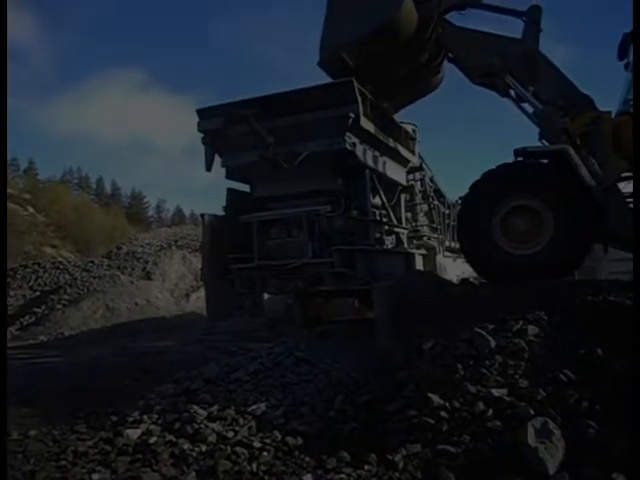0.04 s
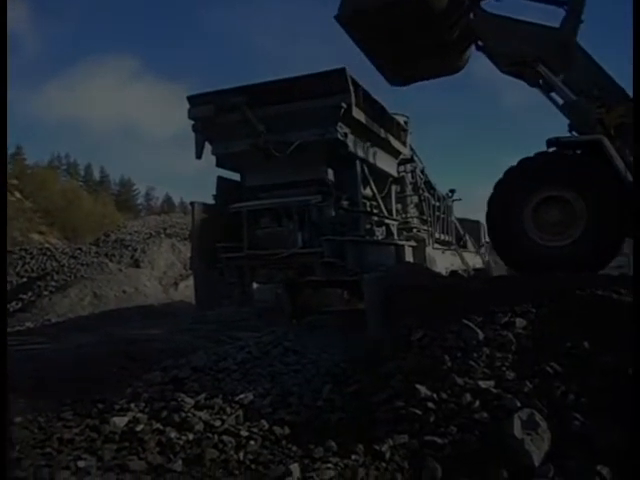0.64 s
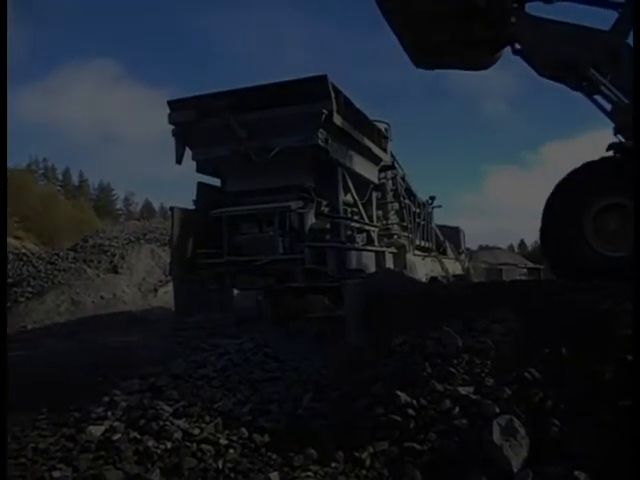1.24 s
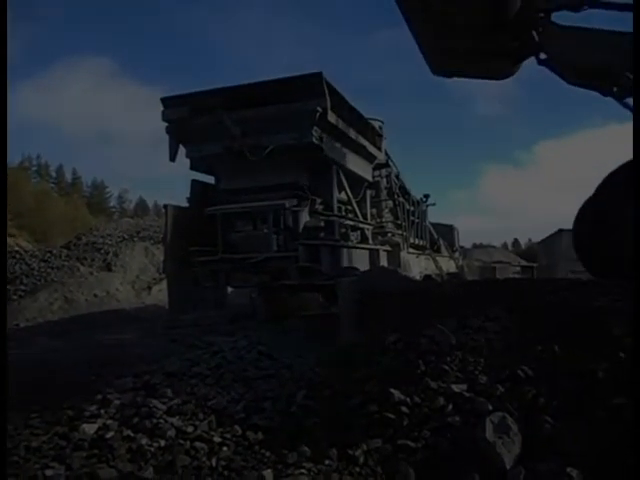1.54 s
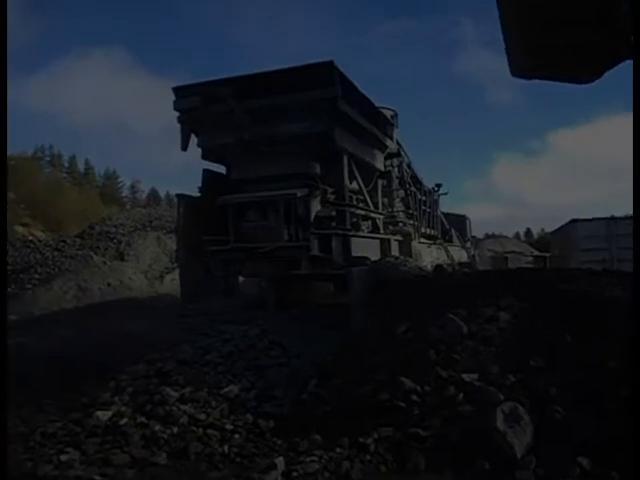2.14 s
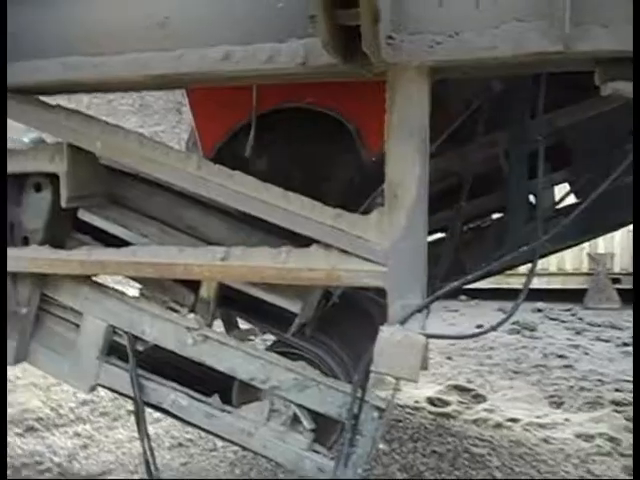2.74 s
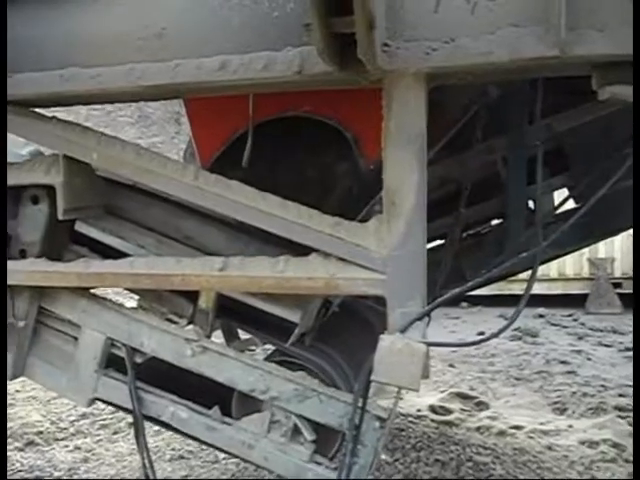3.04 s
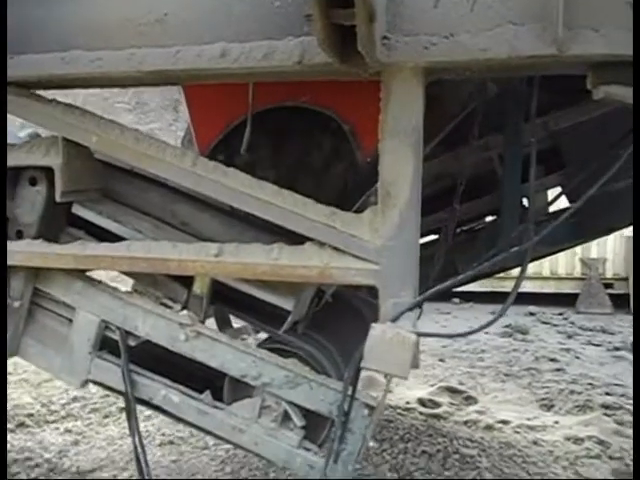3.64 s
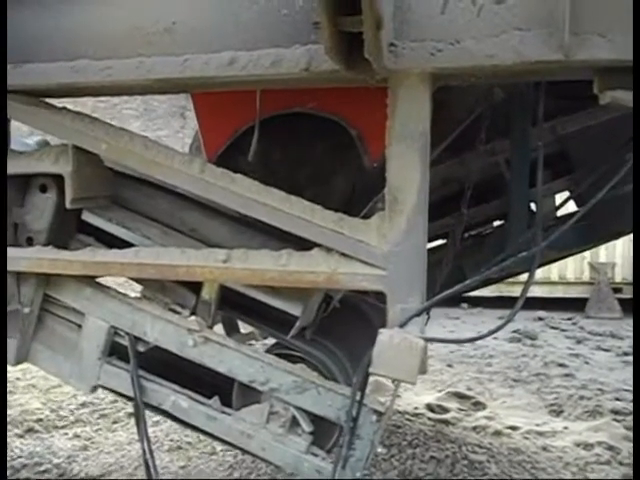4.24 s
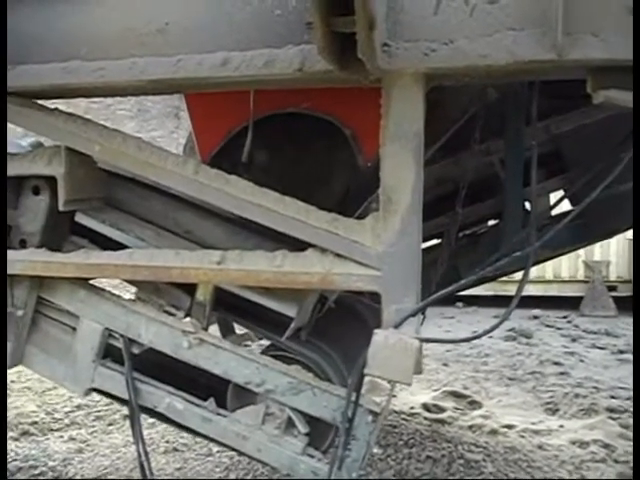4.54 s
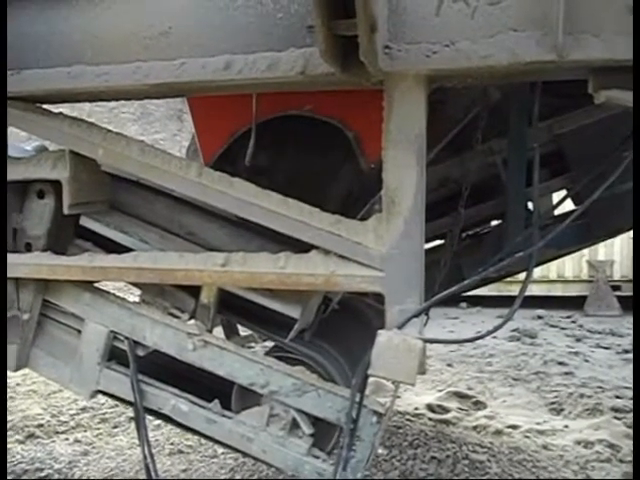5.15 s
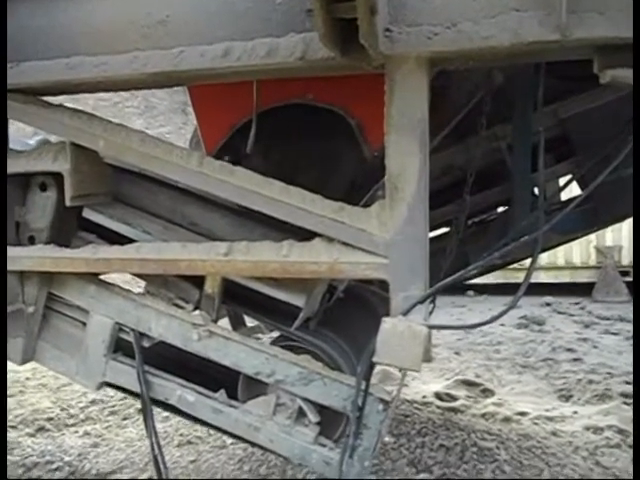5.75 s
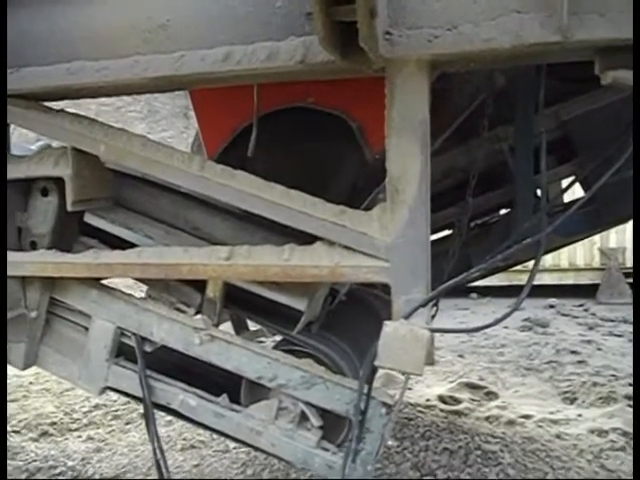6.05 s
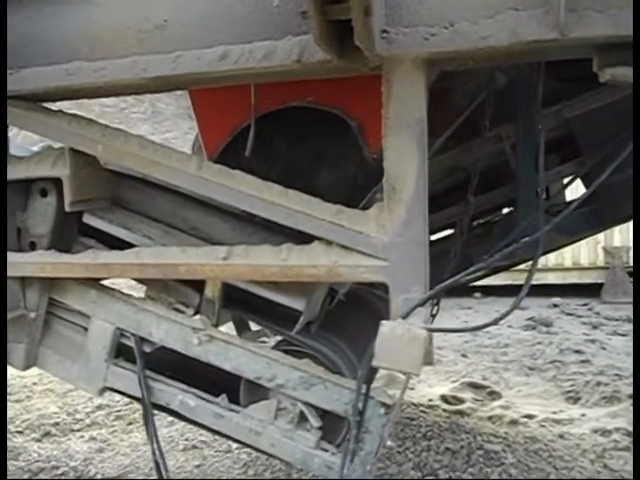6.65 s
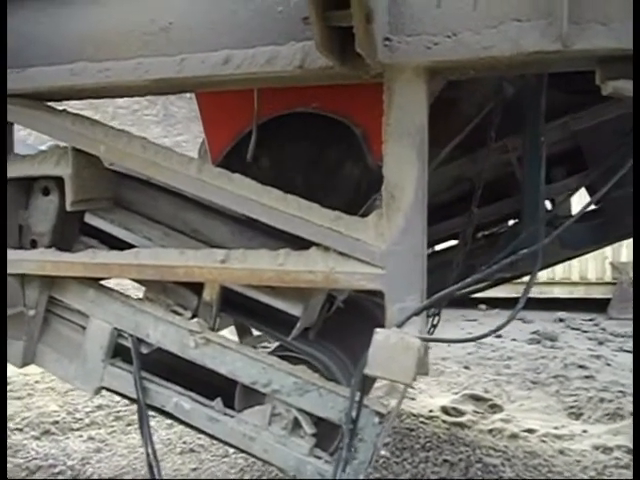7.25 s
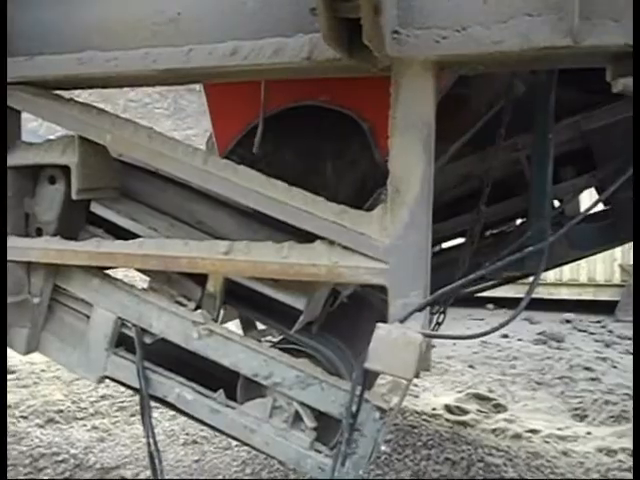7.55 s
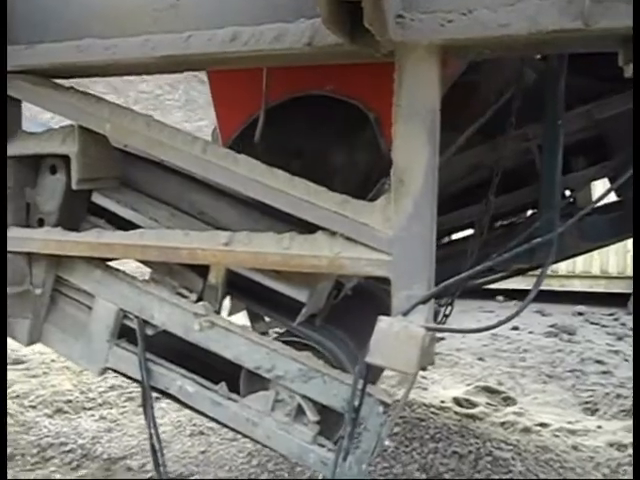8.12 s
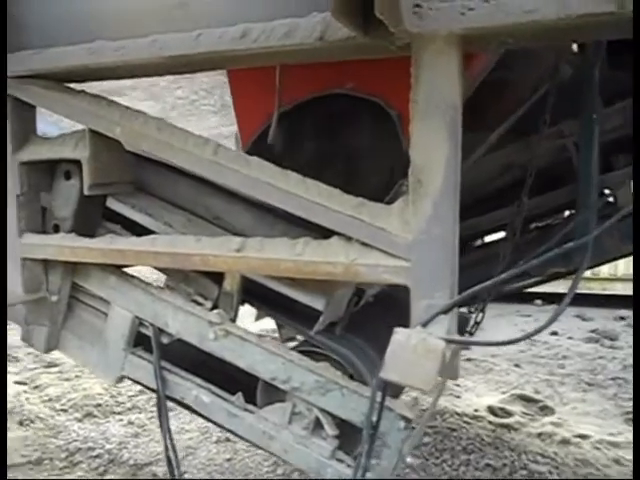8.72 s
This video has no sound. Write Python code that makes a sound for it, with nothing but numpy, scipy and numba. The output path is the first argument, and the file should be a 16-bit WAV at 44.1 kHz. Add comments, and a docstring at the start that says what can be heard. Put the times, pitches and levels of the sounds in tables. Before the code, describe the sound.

Rocks crunch and clatter against steel in a throbbing crusher; after a short silent gap, gravel rattles on with clinks and clanks.

```python
"""Rocks tumble against steel in a mobile rock crusher at work in a gravel pit, and crushed stone rattles.
Both surge as heaps slide and, in front, with each bite of the jaw. Rocks burst, single stones clack,
chips clink and big rocks make steel plates ring. Behind them drone a diesel engine and the screen,
a shaking sieve. We listen in front of the hopper (the feed bin), then, after a silent gap, beside
the conveyor."""
import sys
import numpy as np
from scipy import signal
from scipy.fft import rfft, irfft, next_fast_len
from scipy.io import wavfile
from scipy.ndimage import uniform_filter1d
from numba import njit

SR = 44100
rng = np.random.default_rng(int(sys.argv[2]) if len(sys.argv) > 2 else 0)


def unload_audio(sound):
    """Save the sound as a 16-bit wav file, at the path given as the first command line argument."""
    columns = np.transpose(np.atleast_2d(sound))
    # keep every value between -1 and 1, then stretch to whole-number steps
    steps = np.round(np.clip(columns, -1, 1) * 32767)
    wavfile.write(sys.argv[1], SR, steps.astype(np.int16))


N = 391608
FRONT, SIDE = 1, 2  # the two places we listen from
FRONT_END_S, SIDE_START_S = 2.692, 3.267
SCREEN_HZ, ENGINE_HZ = 16.87, 25.7  # turns per second


def undb(db):
    """Turn decibels into a number to multiply by."""
    return 10 ** (np.asarray(db) / 20)


def unit(x):
    """Scale a signal to an average strength (rms) of one."""
    return x / np.sqrt(np.mean(x ** 2) + 1e-20)


def curve(table, t, column=1):
    """Join the points of a timed table with straight lines."""
    rows = np.array(table)
    return np.interp(t, rows[:, 0], rows[:, column])


def colour(x, points):
    """Shape the tone with (f/Hz, level/dB) points, then scale to strength one."""
    hz, db = np.transpose(points)
    size = next_fast_len(len(x))
    f = np.maximum(np.fft.rfftfreq(size, 1 / SR), 1)
    gain = undb(np.interp(np.log(f), np.log(hz), db))
    return unit(irfft(rfft(x, size) * gain, size)[:len(x)])


def walk(t, rate):
    """A random wobble that takes a new course rate times a second."""
    steps = rng.standard_normal(4096)
    return unit(np.interp((t - t[0]) * rate, np.arange(len(steps)), steps))


def swell(t, s, length):
    """A smooth bump at time s, length seconds wide (0.02 at least) at half height."""
    return .5 ** ((2 * (t - s) / max(length, .02)) ** 2)


def fade(t, t60):
    """Die away by 60 dB every t60 seconds."""
    return np.exp(-np.log(1000) * t / t60)


def add(out, s, x):
    """Mix x into out at time s."""
    i = max(int(s * SR), 0)
    out[i:i + len(x)] += x[:len(out) - i]


def peak_at(db, x):
    """Scale x so that its peak is at db."""
    return undb(db) * x / np.abs(x).max()


@njit
def ring(n, start, size, hz, t60):
    """Every knock starts a pure tone that dies away."""
    out = np.zeros(n)
    for k in range(len(start)):
        z = size[k] + 0j
        pole = np.exp((2j * np.pi * hz[k] - np.log(1000) / t60[k]) / SR)
        for i in range(start[k], min(n, start[k] + int(t60[k] * SR))):
            z *= pole
            out[i] += z.imag
    return out


def scatter(x, t60, echo_db):
    """Echoes among the beams and panels give each knock a noisy tail."""
    keep = np.exp(-2 * np.log(1000) / (t60 * SR))
    energy = signal.lfilter([1 - keep], [1, -keep], x ** 2)
    return x + undb(echo_db) * np.sqrt(energy) * rng.standard_normal(len(x))


def stream(t, per_s, spread_db, band, t60, toss, tones):
    """Stones of all sizes collide, each with its own tones; the screen tosses them once a turn."""
    hits = int(per_s * len(t) / SR)
    start = rng.integers(0, len(t), hits)
    size = undb(spread_db * np.minimum(rng.exponential(size=hits), 5))
    size *= 1 + toss * np.sin(2 * np.pi * SCREEN_HZ * t[start])
    hz = rng.uniform(*band, hits * tones)
    strength = np.repeat(size, tones) * rng.standard_normal(hits * tones)
    ring_s = t60 * rng.uniform(.5, 2.6, hits * tones)
    return unit(ring(len(t), np.repeat(start, tones), strength, hz, ring_s))


def shaft(t, hz, table, place, wander, flutter_db):
    """A turning shaft hums at multiples of its speed; speed and load waver."""
    phase = 2 * np.pi * np.cumsum(hz * (1 + wander * walk(t, 3))) / SR
    out = 0
    for multiple, db in np.array(table)[:, [0, place]]:
        gain = undb(db + flutter_db * walk(t, 10))
        out += gain * np.sin(multiple * phase + rng.uniform(0, 2 * np.pi))
    return np.sqrt(2) * out


def stirred_air(t):
    """The machine stirs the air, too slowly to make a note."""
    noise = rng.standard_normal(len(t))
    return undb(-32) * colour(noise, [(2, -7), (8, -6), (35, 0), (60, -22), (200, -72)])


# Humming drives and panels: f/Hz, width/Hz, front level/dB, side level/dB
PANEL_TONES = [(60, 4.6, -28.5, -43), (216.2, 2.8, -36, -53), (330.4, 22, -38.5, -40), (430, 3, -55.5, -46),
               (480, 5.4, -50, -43), (583, 12, -40, -44.5), (1169, 40, -37.5, -51)]

def panel_hum(t, place):
    """A panel shaken at random hums; the wider its tone, the faster it wavers."""
    out = 0
    for hz, width, *levels in PANEL_TONES:
        drift = walk(t, width) + 1j * walk(t, width)  # moves both level and phase
        out += undb(levels[place - 1]) * (drift * np.exp(2j * np.pi * hz * t)).real
    return out


# Engine tones: multiple of the turning speed, front level/dB, side level/dB
ENGINE_TONES = [(1, -41.5, -44), (1.5, -31.5, -61), (3, -26.5, -30), (6, -33.5, -36), (7.5, -37.5, -57),
                (9, -44, -42)]

def diesel(t, place):
    """Six cylinders drone and fire three times a turn; each firing ticks through the engine block."""
    drone = shaft(t, ENGINE_HZ, ENGINE_TONES, place, wander=.003, flutter_db=1.2)
    since_firing = (3 * ENGINE_HZ * t) % 1
    ticks = np.exp(-since_firing / .3) * rng.standard_normal(len(t))
    return drone + undb(-42) * colour(ticks, [(900, -19.5), (2500, -3), (6500, -1.5), (10000, -27)])


# Screen tones: multiple of the turning speed, front level/dB, side level/dB
SCREEN_TONES = [(1, -25.5, -15), (2, -34, -42), (3, -36, -32.5), (5, -37, -41), (6, -44, -39)]

def screen(t, place):
    """A shaft shakes the big sieve, which pumps the air in a deep throb."""
    return shaft(t, SCREEN_HZ, SCREEN_TONES, place, wander=.002, flutter_db=.6)


# How the shaking of the frame rises and falls in front: t/s, level/dB
FRONT_SHAKING = [(0, -20), (.4, -22), (1.3, -23.3), (1.8, -20.5), (2.2, -20.5), (2.65, -22.5)]
# Tone shape of the frame at each place: f/Hz, level/dB
FRONT_FRAME_TONE = [(12, -15), (35, -9.5), (60, 2), (110, 1.5), (170, 0.5), (250, -5), (330, -16),
                    (500, -19)]
SIDE_FRAME_TONE = [(8, 1), (35, -1), (60, 0.5), (115, 1), (165, -3), (250, -4.5), (330, -12.5), (500, -9.5)]

def frame(t, place, rock_db):
    """Dull thuds from the crushing chamber blur into a rumble; at the side it follows the rock flow."""
    thuds = stream(t, per_s=700, spread_db=1, band=(10, 450), t60=.046, toss=.25, tones=3)
    if place == FRONT:
        return colour(thuds, FRONT_FRAME_TONE) * undb(curve(FRONT_SHAKING, t) - 1.5)
    return colour(thuds, SIDE_FRAME_TONE) * undb(.61 * rock_db - 8.5)


# Chips hitting a steel bar: t/s, level/dB (relative), f/Hz, ring time/s
CHIP_HITS = [(3.67, -17, 6150, 0.18), (3.83, -19, 5420, 0.18), (3.899, -20, 5250, 0.14),
             (3.97, -14, 4790, 0.13), (4.612, -16.5, 4060, 0.1), (4.826, -18.5, 4790, 0.11),
             (5.399, -18, 5400, 0.11), (6.128, -14, 5370, 0.12), (6.329, -15.5, 4670, 0.11)]

def clinks():
    """A chip glances off a bar: a short scrape, then close tones that chatter as they fade."""
    out, t = np.zeros(N), np.arange(SR // 3) / SR
    for s, db, hz, t60 in CHIP_HITS:
        tone_hz = hz * (1 + .025 * rng.standard_normal((9, 1)))
        tones = np.sin(2 * np.pi * (tone_hz * t + rng.random(tone_hz.shape))).sum(axis=0)
        chatter = unit(tones * undb(3 * walk(t, 250)))
        scrape = colour(rng.standard_normal(len(t)), [(hz / 4, -22), (hz, 0), (2 * hz, -22)])
        hit = chatter * fade(t, t60) + 1.3 * scrape * np.exp(-t / .008)
        add(out, s, peak_at(db - .5, hit))
    return out


# Single stones hitting the screen and chute: t/s, peak level/dB, f/Hz, ring time/s
STONE_HITS = [(4.261, -11.5, 2870, .065), (4.921, -8.5, 6740, .045), (5.606, -8.5, 6910, .045),
              (7.023, -13, 5400, .03), (7.167, -13, 6410, .05), (7.54, -11.5, 2820, .04),
              (7.874, -15, 5660, .04), (8.01, -10, 4290, .035)]

def clacks():
    """A stone lands with a crack and rings for an instant with tones around its pitch."""
    out, t = np.zeros(N), np.arange(SR // 5) / SR
    crack_shape = [(1200, -17), (3000, -.5), (4300, 0), (6700, 2), (8500, -10), (11000, -32)]
    for s, db, hz, t60 in STONE_HITS:
        tone_hz = np.minimum(hz * np.exp(.128 * rng.standard_normal((8, 1))), 7200)
        tones = np.sin(2 * np.pi * (tone_hz * t + rng.random(tone_hz.shape))).sum(axis=0)
        crack = colour(rng.standard_normal(len(t)), crack_shape)
        hit = (undb(-10) * unit(tones) + crack) * fade(t, t60)
        add(out, s, peak_at(db, hit))
    return out


# The steel plates' own tones: f/Hz, level/dB (relative), ring time/s
PLATE_TONES = [(336, -11, .15), (431, -15, .25), (587, 0, .36), (675, -6, .2), (904, -4, .2),
               (1015, -6, .16), (1046, -9, .2), (1157, -7, .2)]
# Big rocks landing on steel: t/s, peak level/dB, f/Hz
BIG_ROCK_HITS = [(4.315, -9.5, 587), (4.586, -18, 700), (5.461, -18, 334), (6.229, -18, 900),
                 (6.966, -17.5, 587), (7.156, -19, 584), (7.315, -18.5, 587), (8.19, -8.5, 1000)]

def blows():
    """A big rock thuds onto steel and favours the plate tones near the pitch of the blow."""
    out, t = np.zeros(N), np.arange(SR // 2) / SR
    hz, tone_db, t60 = np.transpose(PLATE_TONES)[:, :, None]
    thud_shape = [(200, -20), (500, 11), (800, -8), (1150, -1), (1600, -23), (6000, -6), (11000, -50)]
    for s, db, pitch_hz in BIG_ROCK_HITS:
        octaves_away = np.abs(np.log2(hz / pitch_hz))
        tones = np.sin(2 * np.pi * (hz * t + rng.random(hz.shape)))
        plate = (undb(tone_db - 5 * octaves_away) * fade(t, t60) * tones).sum(axis=0)
        thud = colour(rng.standard_normal(len(t)), thud_shape) * np.exp(-t / .02)
        soft_start = 1 - np.exp(-t / .003)
        add(out, s, peak_at(db, (plate + .7 * thud) * soft_start))
    return out


# Rocks bursting between the jaws: t/s, level/dB (relative), rough length/s
ROCK_BURSTS = [(0.022, -9.5, 0.027), (0.523, -10, 0.015), (0.587, -13.5, 0.015), (0.668, -6.5, 0.024),
               (0.814, -6, 0.024), (1.004, -11, 0.011), (1.053, -7.8, 0.017), (2.166, -11, 0.023),
               (2.318, -10.5, 0.022), (3.323, -12, 0.028), (3.56, -21, 0.028), (4.308, -6.5, 0.024),
               (5.887, -10.5, 0.01), (8.484, -9.5, 0.02), (8.686, -13.5, 0.017)]

def crunches():
    """A rock gives way in a quick spray of splinters that swells and dies."""
    out, t = np.zeros(N), np.arange(SR // 4) / SR
    shape = [(900, -4.5), (2000, -6.5), (3150, 2), (4200, -8.5), (6800, .5), (8200, -14.5), (11000, -45)]
    for s, db, length in ROCK_BURSTS:
        splinters = stream(t, per_s=4200, spread_db=.9, band=(900, 11000), t60=.018, toss=0, tones=6)
        age = t / length
        burst = colour(splinters, shape) * np.sqrt(age) * np.exp(-age ** 2)
        add(out, s, peak_at(db - 4, burst))
    return out


# Steady flow of stone at each place: t/s, rock level/dB, gravel level/dB (both relative)
FRONT_FLOW = [(0.12, -23.5, -28.5), (0.27, -24.5, -28.5), (0.95, -23.5, -26), (1.19, -22.5, -27.5),
              (1.38, -22.5, -26.5), (1.82, -22, -26.5), (2.42, -22, -27)]
SIDE_FLOW = [(3.5, -28.5, -31), (3.85, -28, -29), (4.8, -28.5, -30), (5.24, -28.5, -29), (5.61, -28.5, -31),
             (5.94, -27, -29), (6.3, -29.5, -29.5), (6.54, -26.5, -29), (7.0, -31, -31), (7.41, -26.5, -29),
             (7.75, -27, -29.5), (8.56, -30, -31.5), (8.8, -27, -29.5)]
# Gaps where rock and gravel both thin out: t/s, level change/dB
FLOW_GAPS = [(0.38, -3), (0.91, -3.5), (1.48, -4), (2.26, -3), (3.42, 0.5), (3.73, -1), (4.86, -1.5),
             (5.43, -3), (5.65, -2), (6.16, -5), (6.46, -4), (6.81, -4.5), (7.06, -3), (8.6, -1),
             (8.745, -3)]
# Heaps sliding and dragging gravel along: t/s, rock change/dB, gravel change/dB, length/s
HEAP_SLIDES = [(0.057, 4, 3.5, 0.085), (0.268, 6, 3, 0.042), (1.008, 4, 1.5, 0.035),
               (1.258, 3.5, 2.5, 0.039), (2.095, 2.5, 2.5, 0.042), (2.176, 2.5, 1.5, .035),
               (3.329, 6.5, 2, 0.067), (3.572, 3, 4.5, .05), (3.69, -2, 2, 0.036), (5.022, 2.5, 1.5, 0.056),
               (5.364, 0, 1.5, 0.035), (5.5, 3.5, 5, 0.043), (5.836, 3.5, 2, 0.076),
               (5.965, 2.5, 1.5, 0.06), (6.266, 6.5, 2, 0.075), (6.536, 2.5, -4, 0.012), (6.69, 3, 2, 0.12),
               (6.97, 1.5, 2.5, 0.086), (7.235, 2.5, 0.5, 0.078), (7.46, 0, 2, .04), (7.73, 2, 0.5, 0.096),
               (7.96, 2, 3.5, 0.042), (8.206, 1.5, 4.5, 0.031), (8.335, 5, 5, 0.045), (8.687, 2, 2, 0.026)]

def feed(t, place):
    """Stone arrives with lumps, gaps and slides; gives the rock and gravel levels in dB."""
    steady = FRONT_FLOW if place == FRONT else SIDE_FLOW
    lumps = .64 * walk(t, rate=18)
    gaps = sum(db * swell(t, s, length=.041) for s, db in FLOW_GAPS)
    rock_db = curve(steady, t, column=1) + lumps + gaps
    gravel_db = curve(steady, t, column=2) + lumps + gaps
    for s, rock_change, gravel_change, length in HEAP_SLIDES:
        slide = swell(t, s, length)
        rock_db += rock_change * slide
        gravel_db += gravel_change * slide
    return rock_db, gravel_db


def jaw(t, bites_per_s=5.35, bite_at_s=.285):
    """The jaw closes at a steady rate: a wave that peaks at each bite."""
    return np.cos(2 * np.pi * bites_per_s * (t - bite_at_s))


# Tone shape of the gravel at each place: f/Hz, level/dB
FRONT_GRAVEL_TONE = [(1000, -18.5), (1450, -3), (1650, -7.5), (1900, -4), (2500, -6.5), (3150, -2),
                     (3900, -11.5), (5000, -7.5), (6400, -3), (7100, -4), (8200, -18), (10200, -34),
                     (11000, -52)]
SIDE_GRAVEL_TONE = [(1000, -2.5), (1450, -9), (1750, -5.5), (2400, -5), (3000, -2), (3700, -4.5),
                    (5000, -5.5), (5900, -4), (6550, 0.5), (7600, -7.5), (9000, -16), (10400, -21.5),
                    (11000, -86)]

def gravel(t, place, flow_db):
    """Crushed stone rattles in little avalanches over a hiss of grit."""
    if place == FRONT:
        shape, spread_db, surge_db, echo_db = FRONT_GRAVEL_TONE, 2.5, 1.32, -1.5
        db = flow_db + .3 * jaw(t) + .65
    else:
        shape, spread_db, surge_db, echo_db = SIDE_GRAVEL_TONE, 3, 1.5, -1.1
        db = flow_db + .93
    clicks = stream(t, per_s=1500, spread_db=spread_db, band=(1100, 11500), t60=.0088, toss=.11, tones=8)
    grit = undb(4.5) * rng.standard_normal(len(t))
    rattle = (clicks + grit) * undb(surge_db * walk(t, 45))
    return colour(scatter(rattle, t60=.026, echo_db=echo_db), shape) * undb(db)


# Tone shape of the tumbling rock at each place: f/Hz, level/dB
FRONT_ROCK_TONE = [(150, -31.5), (260, 7), (380, 5), (490, 0), (620, 6), (800, 3.5), (960, 3.5),
                   (1090, 0.5), (1330, 0.5), (1500, -32.5), (1800, -35.5)]
SIDE_ROCK_TONE = [(150, -29), (260, -2), (370, 0.5), (520, 0), (630, 1), (740, -3), (900, -0.5),
                  (1080, -1.5), (1300, -6), (1500, -12), (1800, -29)]

def rocks(t, place, flow_db):
    """Coarse rock tumbles against the hopper and jaws; in front it swells a little with each bite."""
    if place == FRONT:
        shape, spread_db, echo_db = FRONT_ROCK_TONE, .3, 2.5
        db = flow_db + .23 * jaw(t) - .78
    else:
        shape, spread_db, echo_db = SIDE_ROCK_TONE, -1.2, 5.5
        db = flow_db - 1.3
    knocks = stream(t, per_s=800, spread_db=spread_db, band=(150, 1800), t60=.02, toss=.057, tones=7)
    return colour(scatter(knocks, t60=.3, echo_db=echo_db), shape) * undb(db)


def crusher(t, place):
    """All the running sounds of the machine, heard from one place."""
    rock_db, gravel_db = feed(t, place)
    crushing = frame(t, place, rock_db) + rocks(t, place, rock_db) + gravel(t, place, gravel_db)
    return crushing + screen(t, place) + diesel(t, place) + panel_hum(t, place) + stirred_air(t)


def scene():
    """Single hits over the running machine, first from the front, then from the side."""
    out, t = crunches() + clacks() + clinks() + blows(), np.arange(N) / SR
    add(out, 0, crusher(t[t < FRONT_END_S], FRONT))
    add(out, SIDE_START_S, crusher(t[t >= SIDE_START_S], SIDE))
    return out[None]


def record(dry):
    """Go silent between the two places and cut the highest treble."""
    t, top_hz = np.arange(N) / SR, 10900
    audible = uniform_filter1d(1. * ((t < FRONT_END_S) | (t >= SIDE_START_S)), size=64)
    return signal.sosfilt(signal.ellip(8, .2, 70, top_hz, fs=SR, output="sos"), dry * audible)


dry = scene()
out = record(dry)
unload_audio(out)
```